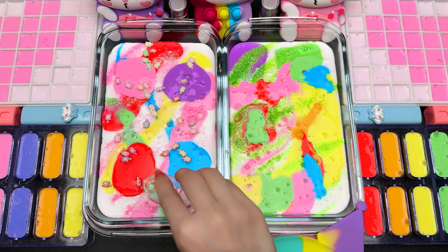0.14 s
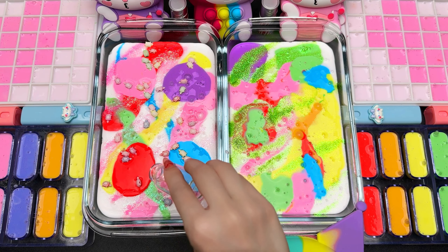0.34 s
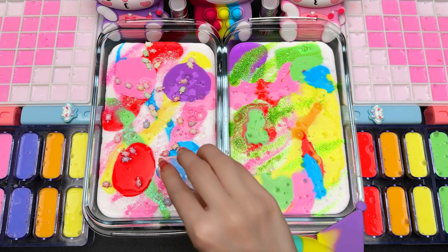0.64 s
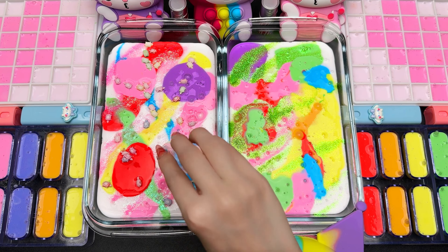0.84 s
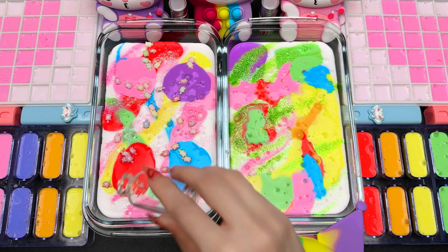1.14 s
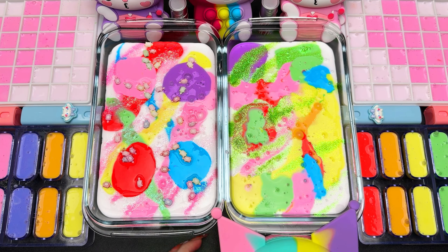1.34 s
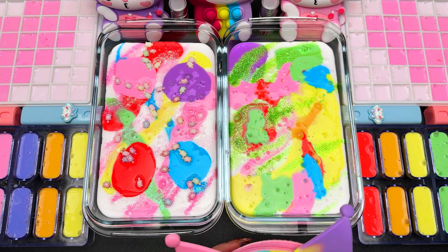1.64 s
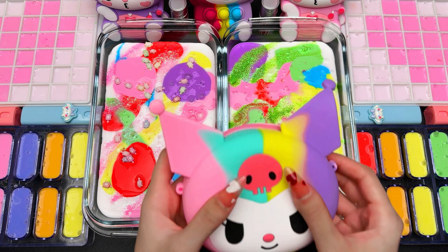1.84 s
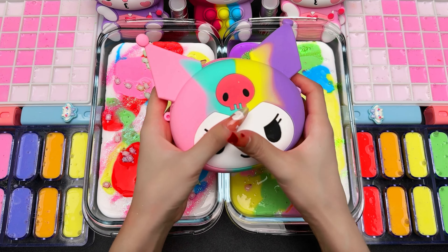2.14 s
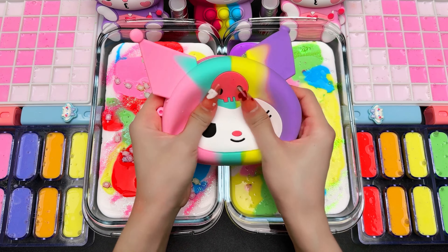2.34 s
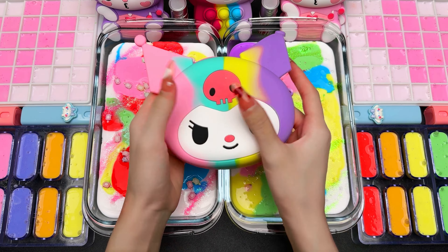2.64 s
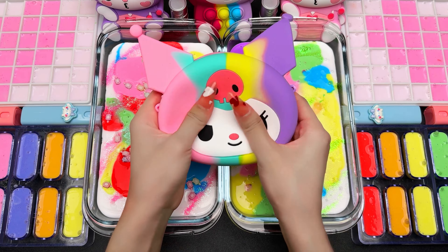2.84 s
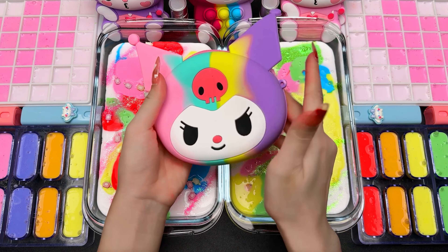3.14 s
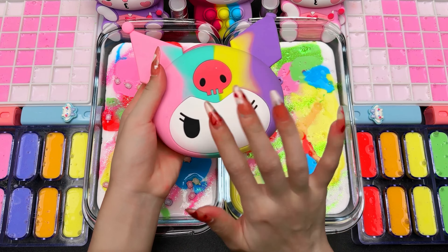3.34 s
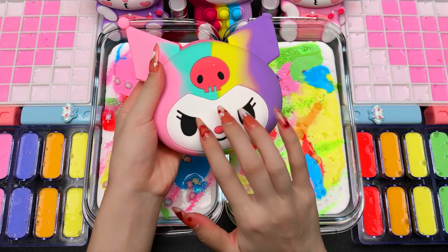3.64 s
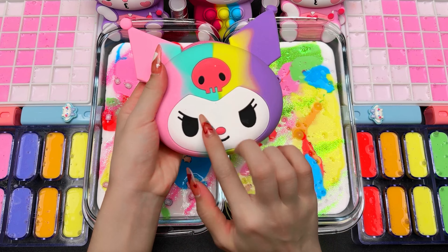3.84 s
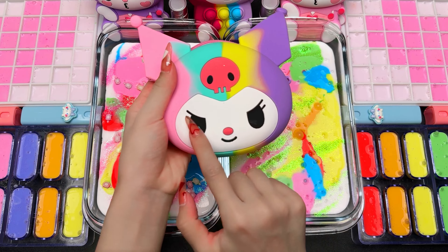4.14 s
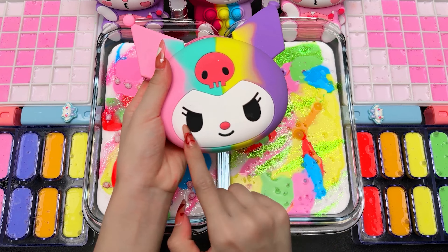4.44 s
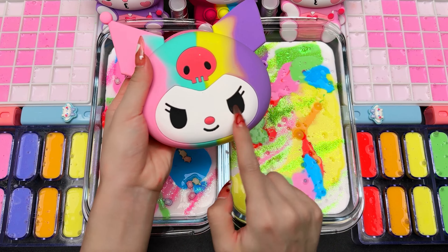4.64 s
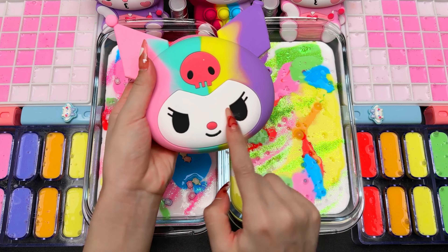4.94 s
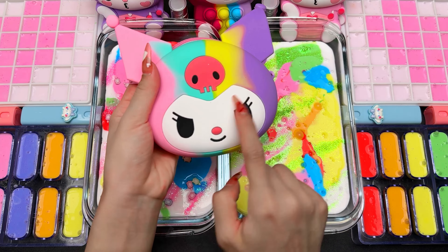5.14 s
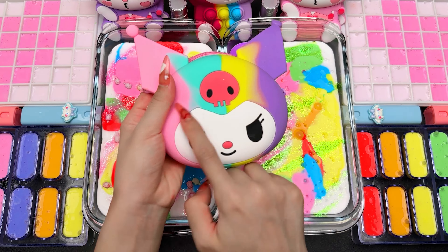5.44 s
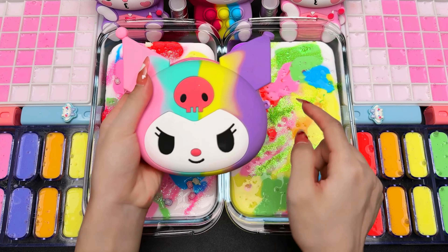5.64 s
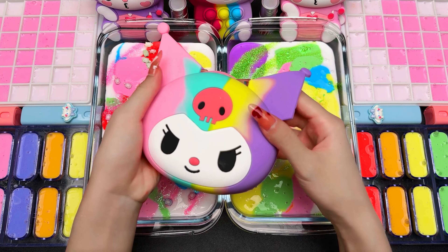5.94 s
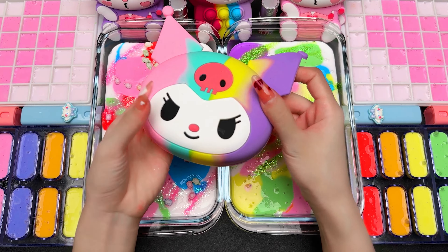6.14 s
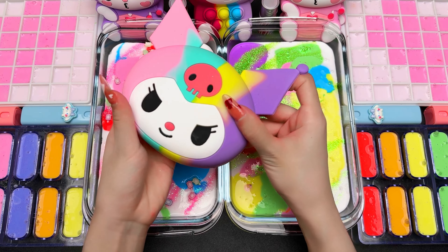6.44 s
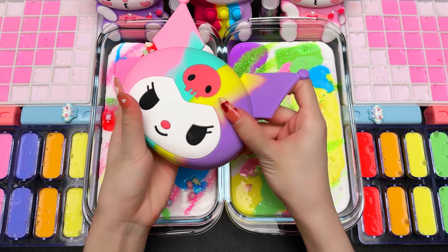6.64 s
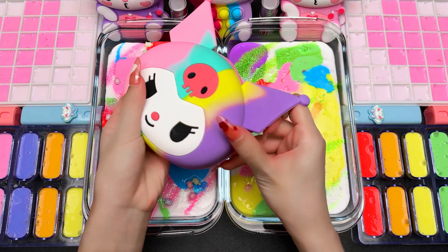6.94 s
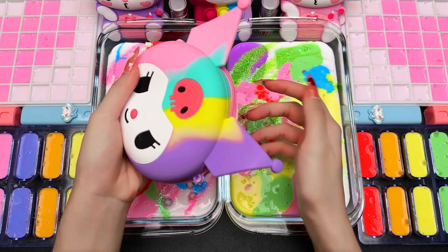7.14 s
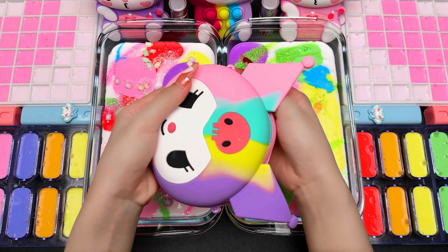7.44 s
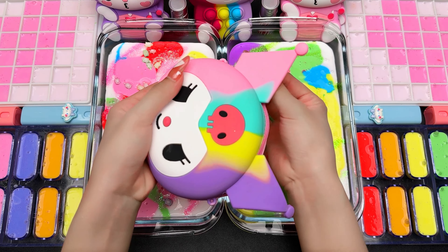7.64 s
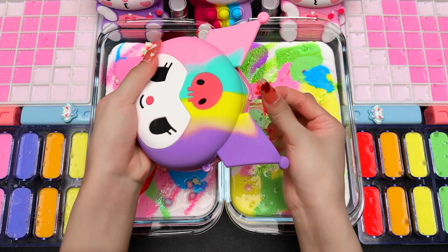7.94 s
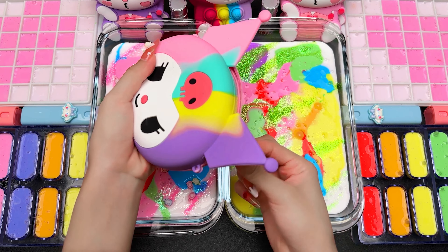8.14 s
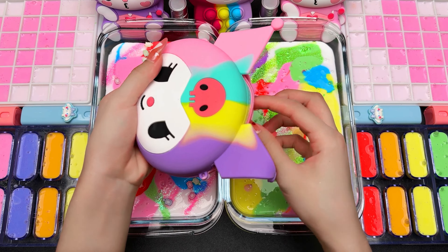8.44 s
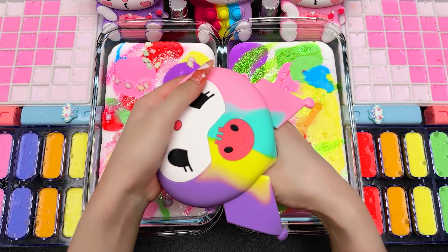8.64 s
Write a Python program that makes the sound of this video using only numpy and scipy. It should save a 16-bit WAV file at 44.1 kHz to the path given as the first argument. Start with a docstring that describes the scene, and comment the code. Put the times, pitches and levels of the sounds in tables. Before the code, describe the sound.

Very close in a quiet room, tiny beads rattle in a glass vial with thin, high tinkling shakes, then the vial knocks onto a table. After a gap of total silence, hands press and drum on a hollow silicone purse with soft, low-mid thuds, dry rubbing and faint squeaks. Three rubbery ear stretches pop free, then a zip opens in short rasps with tiny metal clinks and more handling.

```python
"""Glass vial of beads, then a silicone purse

Close on one microphone in a quiet room, centred: tiny beads rattle in a glass vial, which is then set down.
After an edited gap of silence, hands squeeze, drum on, rub and unzip a hollow silicone purse with a metal zip pull.
Blows ring decaying modes of glass, table, purse or pull, with noise puffs; random grit drives the rolling beads
and, with stick-slip, the rubbed purse. Squeaks are gliding harmonics. A short room tail and steady noise lie behind."""
import sys
import numpy as np
from scipy import signal
from scipy.fft import rfft, irfft
from scipy.io import wavfile

SR = 44100
rng = np.random.default_rng(int(sys.argv[2]) if len(sys.argv) > 2 else 0)


def int16_out(signal):
    """Quantize to a 16-bit WAV file."""
    q = np.round(np.clip(np.atleast_2d(signal).T, -1, 1) * 32767)
    wavfile.write(sys.argv[1], SR, q.astype(np.int16))


def volts_from_decibels(level):
    """Turn decibel levels (scalar or array-like) into linear amplitude factors."""
    exponent = np.asarray(level, float) / 20
    return 10 ** exponent


N = 387638
T = np.arange(N) / SR  # time in seconds

# Room and preamp noise. Each row: frequency in Hz, relative density in dB per Hz.
AIR = [(26, -29), (45, -0.5), (129, -3), (197, -8.5), (382, -6), (656, -11), (779, -12), (2030, -18.5),
       (14500, -15.5), (16000, -35)]
# Steady faint tones. Each row: frequency in Hz, level in dB where the background stands at -67 dB.
HUM = [(199, -74.5), (9372, -88)]
# Edited stretches. Each row: start in seconds, background level in dB, peak ceiling in dB.
STRETCHES = [(0, -68, -4.5), (1.828, -63, -.5), (3.3, -63, -2.3), (7.1, -67, -8.6), (8.12, -64, -6)]
# Edited silence: start and end in seconds.
GAP_S = (1.3, 1.828)
ROOM_T60_S, ROOM_DB = 0.22, -24  # room tail and its level against the close sound
TOP_HZ = 15900  # upper limit of the pickup

# Beads hitting the glass. Each row: time in seconds, then relative dB of top ring, shoulder ring, low click.
BEADS = [(0.0572, -37, -44, -62), (0.0713, -43, -42.5, -39), (0.081, -57.5, -36.5, -31),
         (0.0908, -44, -37.5, -35), (0.1134, -21, -22, -26), (0.116, -23.5, -27, -34.5),
         (0.1322, -11.5, -11.5, -20.5), (0.1347, -20.5, -17.5, -31), (0.1434, -5, -6, -18.5),
         (0.1523, -19.5, -11, -29.5), (0.1609, -35.5, -27.5, -24.5), (0.214, -20, -28, -38),
         (0.218, -11, -7.5, -24), (0.228, -11, -19.5, -18), (0.2508, -13, -10, -11.5),
         (0.2579, -16.5, -15.5, -25), (0.2737, -9, -14.5, -13), (0.2824, -13.5, -14, -26),
         (0.2838, -2.5, -7, -23.5), (0.2923, -16.5, -19, -20), (0.3572, -19.5, -27, -29.5),
         (0.382, -22, -26, -18), (0.3926, -4, -4.5, -19), (0.4043, -24.5, -18, -18),
         (0.423, -15.5, -8, -21.5), (0.4805, -9.5, -12.5, -33), (0.4831, -16.5, -11, -24),
         (0.5336, -4, -9, -15), (0.5571, -12.5, -14, -19.5), (0.5852, -21.5, -21.5, -25),
         (0.61, -26, -29.5, -28), (0.636, -36, -27, -36.5)]
# Vial modes, the first being the air in the neck. Each row: frequency in Hz, relative dB, t60 in seconds.
VIAL = [(836, -14, .1), (4005, -8, .028), (4500, -12, .008), (5780, -14, .015), (7640, -10, .03),
        (8700, -14, .015), (10600, -5, .008), (11280, -2, .015), (11490, -2, .02), (12650, -8, .025),
        (14080, -3, .02), (14440, -1, .04)]
# Shakes that set the loose beads rolling. Each row: time, rise and hold in seconds, then relative dB
# of the upper glass modes and of the neck.
SHAKES = [(0.058, .015, .04, -47.5, -57), (0.13, 0.045, 0.0045, -15, -32.5), (0.227, 0.03, .005, -23, -38),
          (0.263, .06, 0.022, -18, -36.5), (0.401, 0.064, .005, -18, -36), (0.486, 0.038, .002, -24, -63.5),
          (0.546, 0.037, .002, -18.5, -29.5), (0.596, .1, .04, -33, -52.5)]
ROLL_T60_S, NECK_T60_S = .16, 0.11  # how fast the rolling settles
LOWER_DB = -9.5  # lower glass modes against upper
# Knocks of the vial set on the table. Each row: time in seconds, relative dB.
SET_DOWN = [(0.8047, -2.5), (0.8114, -13), (0.8184, -11)]
# Table modes. Each row: frequency in Hz, relative dB, t60 in seconds.
TABLE_MODES = [(1260, -14, 0.08), (1340, -9.5, 0.07), (1895, 5.5, 0.023), (2170, -5, 0.036),
               (3000, -2.5, 0.037), (4000, -9.5, .03), (4506, -1.5, 0.051), (5286, -7, 0.085),
               (11800, -8.5, .02)]

# Purse modes: whole-purse flex, hollow body, skin, rim, and the metal zip pull.
# Each row: frequency in Hz, relative dB, t60 in seconds.
FLEX = [(65, -2.5, 0.078), (113, -0.5, 0.074), (175, 1.5, 0.14)]
BODY = [(217, -16.5, 0.13), (280, 1, 0.045), (352, -3, 0.03), (420, -3, 0.036), (510, -2, 0.033),
        (600, 1.5, 0.03), (695, 1.5, 0.02), (828, -5.5, 0.036), (1046, 0.5, 0.02)]
SKIN = [(1080, -1, .012), (1380, -1, .018), (1700, -3, .011), (2300, -1, .013), (2750, -2, .01)]
RIM = [(3300, 3.5, 0.0058), (3850, -7, 0.025), (4234, -4.5, 0.016), (4950, -4.5, 0.011),
       (5660, -4.5, 0.0052), (6550, -11, 0.0013)]
PULL = [(5450, -3, 0.035), (5860, 1.5, 0.045), (10240, -2.5, 0.03), (11530, 3.5, 0.03),
        (11800, -14.5, .025), (13950, 0, 0.041)]

# Light fingertip brushes, strongest in the skin, slightly weaker in the body, with little rim or hiss.
# Each row: start of hold and hold length in seconds, relative dB.
BRUSHES = [(1.824, .15, -53), (2.14, 0.037, -55.5), (3.96, 0.063, -55.5), (4.047, 0.027, -55),
           (4.128, 0.1, -41.5), (4.47, 0.075, -61), (5.048, 0.067, -35), (5.24, 0.01, -38.5),
           (5.28, 0.027, -46), (7.547, 0.032, -57.5), (8.186, 0.022, -29), (8.475, 0.097, -27.5)]
# Brush offset in dB for body, skin, rim, hiss.
BRUSH_FAMILY_DB = (-4, -0.1, -14.5, -33)
BRUSH_RISE_S, BRUSH_T60_S = 0.011, 0.063
# Skin dragging on silicone. Each row: peak and rise in seconds, relative body dB, dB step from each mode
# family to the next brighter, fade t60 in seconds before the family's share.
STROKES = [(2.223, 0.042, -27, -1.5, 0.63), (2.266, 0.091, -24, 0.5, 0.43), (2.382, 0.09, -27, .1, 0.34),
           (2.5, 0.16, -28.5, -5, 0.21), (2.763, 0.07, -23.5, -2, 0.44), (2.826, 0.13, -34.5, 1.5, 0.29),
           (2.93, 0.45, -41, 0.5, 0.33), (2.977, 0.066, -28, -2.8, 0.38), (3.114, 0.12, -33.5, -12.5, 0.76),
           (3.346, 0.039, -23.5, -4.5, 0.14), (3.374, 0.079, -38, -16, 0.078),
           (3.454, .045, -16, -10, 0.15), (3.52, 0.057, -23, -14, 0.28), (3.603, 0.099, -23.5, -11, 0.15),
           (3.664, 0.015, -7.5, -24, 0.11), (3.762, .08, -34.5, -16, 0.15),
           (4.053, 0.026, -35.5, -23, 0.14), (4.202, 0.014, -36.5, -11, 0.22),
           (4.272, 0.048, -28, -5.5, 0.75), (4.515, 0.022, -18, -25.5, 0.087),
           (4.609, 0.031, -27.5, -2, 0.42), (4.684, 0.023, -11, -16, 0.098),
           (4.793, 0.035, -28.5, -22, 0.14), (4.867, 0.017, -22, -10, 0.18), (4.902, 0.093, -25, -7.5, 0.6),
           (5.045, 0.014, -24.5, -20, 0.14), (5.116, 0.047, -25.5, -23, 0.071),
           (5.261, 0.047, -42, .5, 0.19), (5.394, 0.052, -29.5, -1.9, 0.57),
           (5.422, 0.031, -21, -8.5, 0.33), (5.461, 0.11, -18.5, -3.5, 0.17),
           (5.68, 0.024, -18.5, -21, 0.13), (5.773, 0.017, -13, -8, 0.14), (5.852, .1, -28, -2.5, 0.23),
           (5.921, 0.22, -39, -5.5, 0.4), (6.108, 0.024, -27.5, -7.5, 0.37),
           (6.181, 0.022, -16.5, -8, 0.094), (7.05, 0.039, -45.5, -15.5, 0.28),
           (7.285, 0.017, -30.5, -1, 0.23), (7.32, 0.062, -28.5, -2.5, 0.045),
           (7.518, 0.018, -58, -1, 0.22), (7.566, 0.034, -25.5, -31, 0.39), (8.172, .02, -26, -6.5, 0.14),
           (8.195, 0.02, -39, -3.5, 0.16), (8.285, 0.078, -29.5, -2.5, 0.2),
           (8.266, 0.028, -23.5, -1.5, 0.079), (8.33, 0.092, -27, -6, 0.15), (8.38, 0.083, -27.5, -7, 0.21),
           (8.44, .12, -22, -10, 0.41), (8.495, 0.17, -23, -20, 0.33), (8.565, 0.21, -21, -12.5, 0.35),
           (8.62, 0.077, -31, -7, 0.07), (8.687, 0.097, -30.5, -6.5, 0.22), (8.765, 0.081, -40, -6.5, 0.28)]
# Friction trim in dB for body, skin, rim, hiss.
FAMILY_DB = (0.069, 0.049, 0.19, -0.18)
# Share of the fade time for body, skin, rim, hiss.
FAMILY_FADE = (0.8, 0.71, 0.78, 0.44)
# Near-regular stick-slip on ear pulls, zip teeth and a late rub of the purse.
# Each row: start and end in seconds, slips per second, share of the drive's power from 0 to 1.
SLIPS = [(6.288, 6.36, 670, 0.5), (6.528, 6.585, 330, .7), (6.782, 6.842, 300, 0.5),
         (7.684, 8.062, 295, 0.6), (8.405, 8.629, 280, 0.5)]
# Ears stretched until they slip from the fingers. Each row: grip and slip time in seconds,
# relative dB of stretch and slip, cavity pitch in Hz.
EARS = [(6.31, 6.346, -11.5, -9.5, 532.5), (6.534, 6.569, -22.5, -7, 688), (6.775, 6.831, -16, -8.5, 524)]
GRIP_RISE_S, STRETCH_STEP_DB = 0.065, -8  # step from family to family
SLIP_RISE_S, SLIP_HOLD_S, SLIP_T60_S = 0.038, 0.0065, 0.013
# Slip offset in dB for body, skin, rim, hiss.
SLIP_FAMILY_DB = (1, -5, 3.5, -18)
WOBBLE_DB, WOBBLE_STEP_DB, WOBBLE_T60_S = -10, -2, 0.11  # the freed ear shaking out
# Zip drawn open. Each row: time in seconds, relative body dB, dB step from family to family, cavity pitch in Hz.
ZIP = [(7.652, -61.5, -18.5, 295), (7.702, -13.5, -13, 397), (7.732, -16, -7, 450),
       (7.962, -17.5, -4.5, 491.4), (7.99, -25.5, -3.5, 510), (8.031, -7, -7.5, 698),
       (8.045, -14, -10, 639), (8.059, -40.5, -4.5, 629), (8.16, -46, -21, 600)]
# Zip offset in dB for body, skin, rim, hiss: the teeth sound in the rim more than as hiss.
ZIP_FAMILY_DB = (1.45, 1.2, 4.5, -5)
# Fingertips on the purse. Each row: time in seconds, relative dB of body thud and slap, cavity pitch in Hz.
TAPS = [(2.1865, -24, -23.5, 575), (2.2218, -10, -39.5, 385), (2.2725, -5, -3.5, 557),
        (2.3038, -16, -22, 420), (2.3766, -6.5, -2, 544), (2.4966, -18, -25.5, 369.5),
        (2.621, -28, -41, 906), (2.7713, -15, -19.5, 440), (2.7942, -14.5, -21, 332),
        (2.8178, -13.5, -12, 300.6), (2.9119, -48, -29.5, 934), (2.9643, -13, -31, 510),
        (2.9782, -25, -43.5, 287.7), (3.0196, -15, -21, 366.5), (3.1035, -11, -17.5, 396.4),
        (3.3402, 9.5, 1, 420), (3.346, -21, -27.5, 357.3), (3.3713, -19, -23.5, 470),
        (3.4432, 3.5, -2.5, 364), (3.507, -1.5, -11, 448), (3.5266, -4.5, -16.5, 542),
        (3.5929, -1, -3.5, 356), (3.6508, -1.5, -10.5, 420), (3.663, -4, -16, 420), (3.6702, -10, -16, 352),
        (3.75, -18, -36, 399), (4.0498, -31.5, -48, 484), (4.2, -12.5, -14, 478), (4.2623, -4.5, -4.5, 643),
        (4.2813, 7, -6.5, 510), (4.3377, -7, -21, 491), (4.5137, -23.5, -53, 514), (4.6075, -12, -14, 600),
        (4.6145, -11, -10.5, 600), (4.639, -11.5, -45, 483), (4.6776, -5.5, -8, 420),
        (4.6906, -19, -10.5, 465), (4.7868, -16.5, -43, 525), (4.8612, -15, -17, 333),
        (4.8935, -24, -7, 519), (4.9338, -24, -23, 375), (4.9598, -14, -23, 559), (4.9906, -19, -31, 448),
        (5.041, -9, -38, 388), (5.057, -22, -29, 420), (5.1053, -8.5, -13.5, 457),
        (5.2406, -52, -30.5, 635), (5.3062, -20.5, -39, 585), (5.4171, -12, -27, 298),
        (5.4571, 2, -9.5, 373.5), (5.6781, -23.5, -38, 482), (5.777, -4.5, -26.5, 462),
        (5.8046, -8.5, -21.5, 342), (5.8373, -19.5, -10.5, 508), (5.8632, -14, -17, 514),
        (6.1049, -18, -19, 280), (6.176, -10.5, -12.5, 702), (6.2646, -6, -15.5, 533), (6.513, -3, -9, 433),
        (6.5299, -7, -30.5, 466), (6.749, 1, -7.5, 417.3), (6.7736, -0.5, -13, 445),
        (6.839, -5.5, -18, 462.5), (7.5551, -12.5, -43.5, 420), (7.69, -14, -22, 380),
        (8.233, -36, -16.5, 600), (8.3142, -15, -18, 625), (8.333, -24, -45, 233),
        (8.4244, -15.5, -19.5, 601), (8.4363, -33, -20.5, 613), (8.4886, -5.5, -17, 476),
        (8.4996, -10, -14, 544), (8.5425, -24, -13, 600), (8.5554, -8.5, -16, 540),
        (8.567, -28, -10, 483.6), (8.6786, -12, -22.5, 517), (8.6955, -16, -32, 566)]
# Nails and sticky skin ticking. Each row: time in seconds, relative dB.
TICKS = [(2.216, -12), (2.3731, -16), (2.3781, -11), (2.66, -48), (2.688, -50), (2.739, -3), (2.7581, -11),
         (3.343, -19.5), (3.3664, -29), (3.3772, -21), (3.3928, -27.5), (3.4427, -21.5), (3.4587, -29),
         (3.469, -23), (3.5925, -23), (4.2654, -25.5), (4.284, -19.5), (4.6145, -8), (4.677, -25),
         (4.6908, -28), (5.4245, -27), (5.454, -25), (5.5577, -48), (5.778, -6), (5.8028, -18.5),
         (5.8362, -27), (5.855, -38), (5.94, -44), (6.2172, -25.5), (6.2673, -26.5), (6.5174, -8),
         (6.7529, -13), (6.835, -10), (7.2868, -28), (7.2927, -29), (7.3157, -17.5), (7.3275, -23),
         (8.2, -36), (8.2831, -26.5), (8.38, -39), (8.568, -33), (8.6808, -51)]
# Thumbs squeaking. Each row: start and end in seconds, first and last pitch in Hz, relative dB.
SQUEAKS = [(2.223, 2.265, 1090, 1360, -23), (2.25, 2.282, 885, 1230, -29), (2.8, 2.852, 800, 977, -30)]
# Presses that flex the whole purse. Each row: time in seconds, relative dB.
PRESSES = [(2.269, -33.5), (2.383, -25.5), (2.499, -30.5), (2.767, -13.5), (2.826, -27), (2.979, -20),
           (3.113, -45), (3.359, -19.5), (3.453, -11.5), (3.52, -14.5), (3.603, -20), (3.662, -26),
           (3.76, -21), (4.274, -54), (4.611, -67), (5.088, -52), (5.41, -24.5), (5.462, -27.5),
           (5.681, -25), (5.774, -20), (5.852, -30.5), (6.107, -44.5), (6.165, -45.5), (6.345, -38),
           (6.522, -43), (6.565, -20), (6.835, -30.5), (7.322, -47), (7.572, -50.5), (7.72, -45.5),
           (7.989, -40), (8.045, -41), (8.195, -50), (8.345, -43), (8.495, -29.5), (8.565, -26)]
PRESS_RISE_S, PRESS_T60_S = 0.035, .13
# Zip pull clinking. Each row: time in seconds, relative dB of low, middle and top ring.
CLINKS = [(2.5102, -73, -50, -42), (2.519, -32, -64, -33), (2.5803, -34.5, -66, -38),
          (2.7765, -23.5, -31, -53), (2.973, -18.5, -34, -55), (2.998, -31, -28, -55),
          (3.018, -55, -64, -45), (3.171, -45, -54, -65), (3.362, -21, -43, -55), (3.3674, -29, -17, -48),
          (3.3853, -32, -51, -52), (3.4522, -27, -19, -69), (5.5562, -37, -22.5, -80),
          (5.641, -39.5, -66, -71), (5.6661, -30.5, -46, -63), (5.695, -33.5, -60, -59),
          (5.72, -47, -62.5, -74.5), (5.953, -70, -41.5, -60), (6.2171, -22.5, -29.5, -59),
          (6.431, -29.5, -60.5, -56), (8.1839, -34.5, -55, -41), (8.2435, -30, -72, -57),
          (8.2646, -36, -53, -29), (8.2807, -14.5, -41, -17), (8.6782, -25.5, -62, -31)]


def unit(x):
    """Scale to rms 1."""
    return x / np.sqrt(np.mean(x ** 2))


def band(x, lo_hz, hi_hz):
    """Gentle band-pass."""
    edges = [lo_hz, min(hi_hz, .45 * SR)]
    return signal.sosfilt(signal.butter(2, edges, "band", fs=SR, output="sos"), x)


def train(s, size):
    """Impulses at the given times."""
    return np.bincount(np.minimum((np.asarray(s) * SR).astype(int), N - 1), size, N)


def mode(x, hz, t60):
    """One decaying resonance, impulse peak near 1."""
    radius = np.exp(-np.log(1000) / (t60 * SR))
    angle = 2 * np.pi * hz / SR
    return signal.lfilter([0, np.sin(angle)], [1, -2 * radius * np.cos(angle), radius ** 2], x)


def ring(x, modes):
    """All modes of one object, neighbours in opposite phase."""
    return sum((-1) ** k * volts_from_decibels(db) * mode(x, hz, t60) for k, (hz, db, t60) in enumerate(modes))


def strike(s, db, modes, scatter_db, push_s, pitch_hz=None, focus_db=30):
    """Each blow weights the modes anew, most those near its pitch; a softer contact pushes longer."""
    hz, weight_db, t60 = np.transpose(modes)
    chance = rng.standard_normal((len(s), len(modes), 2))
    if pitch_hz is not None:
        weight_db = weight_db - focus_db * np.log2(hz / pitch_hz[:, None]) ** 2
    size = volts_from_decibels(weight_db + scatter_db * chance[..., 0]) * np.sign(chance[..., 1])
    size = volts_from_decibels(db)[:, None] * size / np.sqrt(np.sum(size ** 2, axis=1, keepdims=True))
    out = sum(mode(train(s, size[:, k]), hz[k], t60[k]) for k in range(len(modes)))
    push = np.hanning(int(push_s * SR) + 3)
    return np.convolve(out, push / push.sum())[:N]


def burst(s, db, decay_s):
    """A noise puff that dies away after each hit."""
    envelope = signal.lfilter([1], [1, -np.exp(-1 / (decay_s * SR))], train(s, volts_from_decibels(db)))
    return envelope * rng.standard_normal(N)


def grit(per_s, spread_db):
    """Random small contacts, a few much larger than the rest."""
    chance = rng.random((3, N))
    hit = chance[0] < per_s / SR
    return unit(hit * np.sign(chance[1] - .5) * volts_from_decibels(-spread_db * np.log(1 - chance[2])))


def curve(s, db):
    """Gain over time from dB points, silent outside them."""
    return volts_from_decibels(np.interp(T, s, db, left=-np.inf, right=-np.inf))


def wander(per_s):
    """Slow random drift, spread near 1."""
    knots = rng.standard_normal(size=500)
    return np.interp(T * per_s, np.arange(len(knots)), knots)


def swell(s, db, rise_s, hold_s, t60):
    """Gain of many gestures summed in power: up 40 dB over the rise, held, then fading."""
    coarse = T[::32]
    t = coarse[:, None] - s
    shape_db = np.where(t < 0, 40 * t / np.abs(rise_s), -60 * np.maximum(t - hold_s, 0) / np.abs(t60))
    return np.interp(T, coarse, np.sqrt(np.sum(volts_from_decibels(2 * (db + shape_db)), axis=1)))


def stretch(axis):
    """One column of the stretch table, held until the next cut."""
    rows = np.array(STRETCHES)
    return rows[np.clip(np.searchsorted(rows[:, 0], T, "right") - 1, 0, None), axis]


def air():
    """Steady coloured noise with two faint tones, its level stepping at each cut."""
    hz, db = np.transpose(AIR)
    f = np.arange(N // 2 + 1) * SR / N + 1
    colour = volts_from_decibels(np.interp(np.log(f), np.log(hz), db))
    noise = unit(irfft(rfft(rng.standard_normal(N)) * colour, N))
    tones = sum(volts_from_decibels(d + 67) * np.sin(2 * np.pi * h * T) for h, d in HUM)
    return (noise + tones) * volts_from_decibels(stretch(axis=1))


def bead_hits():
    """Single beads strike the glass: scattered modes ring in three ranges, each with a puff of noise."""
    s, top_db, shoulder_db, click_db = np.transpose(BEADS)
    low = strike(s, click_db - 1.0, VIAL[1:6], 15.0, 0)
    low = low + band(burst(s, click_db + 4, 0.0025), 1900, 5300)
    shoulder = strike(s, shoulder_db - 0.5, VIAL[6:10], 1.2, 0)
    shoulder = shoulder + band(burst(s, shoulder_db + 0.5, 0.0042), 9500, 13000)
    top = strike(s, top_db, VIAL[10:], 3.9, 0)
    top = top + band(burst(s, top_db + 0.5, 0.0015), 13000, 15000)
    return low + shoulder + top


def rolling_beads():
    """Shaken loose beads make many tiny contacts that excite the glass and the air in the neck."""
    s, rise_s, hold_s, db, neck_db = np.transpose(SHAKES)
    rolling = swell(s, db, rise_s, hold_s, ROLL_T60_S)
    contacts = grit(2100, 2.1)
    high = unit(ring(contacts, VIAL[6:])) + .7 * unit(band(contacts, 9000, 16000))
    high = 0.43 * unit(high) * rolling
    mid = 0.72 * unit(ring(contacts, VIAL[1:6])) + unit(band(contacts, 2200, 9000))
    mid = 0.54 * unit(mid) * rolling * volts_from_decibels(LOWER_DB)
    neck = unit(ring(contacts, VIAL[:1])) * swell(s, neck_db, rise_s, hold_s, NECK_T60_S)
    return high + mid + neck


def vial_set_down():
    """The base knocks on the table: table modes with a short and a longer noise puff."""
    s, db = np.transpose(SET_DOWN)
    knock = strike(s, db - 4.5, TABLE_MODES, 1.3, 0)
    puff = band(burst(s, db - 1.5, .003), 860, 13000) + band(burst(s, db - 21.5, 0.03), 990, 8000)
    shudder = ring(burst(s, db - 45.5, 0.04), TABLE_MODES[:2])  # the vial settles
    return knock + puff + shudder


def friction():
    """Irregular grit everywhere; where the silicone grips, jittered slips take over."""
    drive = unit(grit(3000, 2.4) + .8 * rng.standard_normal(N))
    drive = unit(drive * volts_from_decibels(5.2 * wander(45)))  # skin catches and lets go
    for t0, t1, per_s, share in SLIPS:
        chance = rng.standard_normal(size=(256, 2))
        s = t0 + np.cumsum((1 + 0.13 * chance[:, 0]) / per_s)
        size = (s < t1) * volts_from_decibels(2.0 * chance[:, 1]) * np.sqrt(SR / per_s)
        mixed = np.sqrt(1 - share) * drive + np.sqrt(share) * 0.82 * train(s, size)
        drive = np.where((T > t0) & (T < t1), mixed, drive)
    return drive


def cavity_hz():
    """The cavity pitch glides from one tap, ear slip or zip position to the next."""
    points = [(r[0], r[-1]) for r in TAPS + ZIP] + [(r[1], r[-1]) for r in EARS]
    s, hz = np.transpose(sorted(points))
    return np.interp(T, s, hz)


def gripped(x, modes, drift_db, pitch_hz=None, focus_db=30):
    """A shifting grip damps some modes and frees others, most those near the squeezed cavity's pitch."""
    out = 0
    for k, (hz, db, t60) in enumerate(modes):
        if pitch_hz is not None:
            db = db - focus_db * np.log2(hz / pitch_hz) ** 2
        out = out + (-1) ** k * volts_from_decibels(db + drift_db * wander(14)) * mode(x, hz, t60)
    return out


def grip(k):
    """How hard strokes, brushes, ear pulls and the zip excite mode family k, counted from the body up."""
    s, rise_s, db, step_db, t60 = np.transpose(STROKES)
    strokes = swell(s, db + k * step_db, rise_s, 0, t60 * FAMILY_FADE[k])
    s, length_s, db = np.transpose(BRUSHES)
    brushes = swell(s, db + BRUSH_FAMILY_DB[k], BRUSH_RISE_S, length_s, BRUSH_T60_S)
    s, slip_s, db, slip_db, _ = np.transpose(EARS)
    pull = swell(s, db + k * STRETCH_STEP_DB, GRIP_RISE_S, slip_s - s, SLIP_T60_S)
    slip = swell(slip_s, slip_db + SLIP_FAMILY_DB[k], SLIP_RISE_S, SLIP_HOLD_S, SLIP_T60_S)
    wobble_db = slip_db + WOBBLE_DB + k * WOBBLE_STEP_DB
    wobble = swell(slip_s, wobble_db, SLIP_RISE_S, SLIP_HOLD_S, WOBBLE_T60_S)
    s, db, step_db, _ = np.transpose(ZIP)
    unzip = curve(s, db + k * step_db + ZIP_FAMILY_DB[k])
    return (strokes + brushes + pull + slip + wobble + unzip) * volts_from_decibels(FAMILY_DB[k])


def rubbing(drive):
    """Friction excites each family of purse modes as hard as the grip allows."""
    body = band(gripped(drive, BODY, 4.7, cavity_hz(), 14.3), 200, 1100)
    skin = band(gripped(drive, SKIN, 3.5), 800, 3200)
    rim = band(gripped(drive, RIM, 2.4), 2600, 7500)
    hiss = band(band(drive, 6000, 14000), 6000, 12500)
    return 0.79 * sum(unit(part) * grip(k) for k, part in enumerate([body, skin, rim, hiss]))


def taps():
    """Fingertips thud into the hollow body at the cavity's pitch and slap skin and rim."""
    s, body_db, slap_db, pitch_hz = np.transpose(TAPS)
    thud = band(strike(s, body_db - 0.5, BODY, 3.0, 0.00039, pitch_hz, 25), 260, 4000)
    slap = strike(s, slap_db - 1.0, SKIN + RIM, 1.3, 0.00032)
    puff = band(band(burst(s, slap_db + 7.5, 0.003), 420, 2145), 730, 7700)
    return thud + slap + puff


def ticks():
    """Nails and sticky skin tick as very short bright puffs."""
    s, db = np.transpose(TICKS)
    return band(burst(s, db + 2.5, 0.00072), 2200, 15000)


def squeaks():
    """Fast regular stick-slip: a short gliding stack of harmonics."""
    out = np.zeros(N)
    for t0, t1, from_hz, to_hz, db in SQUEAKS:
        phase = 2 * np.pi * np.cumsum(np.interp(T, [t0, t1], [from_hz, to_hz])) / SR
        shape = np.sin(np.pi * np.clip((T - t0) / (t1 - t0), 0, 1)) ** 0.6
        harmonics_db = (-1.5, -1.0, -2.5, -6.5, -9.5)
        stack = sum(volts_from_decibels(h) * np.sin((k + 1) * phase) for k, h in enumerate(harmonics_db))
        out += volts_from_decibels(db) * shape * stack
    return out


def presses(drive):
    """Pressing flexes the whole purse: friction excites its lowest modes."""
    s, db = np.transpose(PRESSES)
    flex = unit(band(ring(drive, FLEX), 49, 130))
    return 0.79 * flex * swell(s, db, PRESS_RISE_S, 0, PRESS_T60_S)


def zip_pull():
    """Metal modes ring at each clink, and the loose pull keeps rattling as fading band noise."""
    s, low_db, middle_db, top_db = np.transpose(CLINKS)
    low = strike(s, low_db - 7, PULL[:2], 4.0, 0)
    middle = strike(s, middle_db - 7, PULL[2:5], 4.0, 0)
    top = strike(s, top_db - 4.0, PULL[5:], 7.5, 0)
    low_rattle = band(band(burst(s, low_db + 7.5, 0.013), 5300, 6150), 5300, 6150)
    middle_rattle = band(band(burst(s, middle_db + 2.5, 0.018), 10000, 12400), 10000, 12400)
    return low + middle + top + low_rattle + middle_rattle


def room_tail(near):
    """The short tail of the room: decaying band noise that begins 4 ms after the close sound."""
    t = T[:SR // 2]
    fade = np.exp(-np.log(1000) * t / ROOM_T60_S) * (t > .004)
    room = band(rng.standard_normal(len(t)), 300, 5700) * fade
    return volts_from_decibels(ROOM_DB) * signal.fftconvolve(near, room / np.sqrt(np.sum(room ** 2)))[:N]


def scene():
    """Everything close and centred, with a short room tail; the gap is cut to silence."""
    vial = bead_hits() + rolling_beads() + vial_set_down()
    drive = friction()
    purse = rubbing(drive) + taps() + ticks() + squeaks() + presses(drive) + zip_pull()
    near = vial + purse
    mix = near + room_tail(near) + air()
    mix = mix * ((T < GAP_S[0]) | (T > GAP_S[1]))
    return np.array([mix, mix])


def low_pass(x):
    """Removes everything above the highest recorded frequency."""
    return signal.sosfilt(signal.butter(12, 16800, fs=SR, output="sos"), x)


def record(dry):
    """Loud peaks flatten at a ceiling that differs from stretch to stretch; the top is cut."""
    ceiling = volts_from_decibels(stretch(axis=2))
    flattened = dry / (1 + np.abs(dry / ceiling) ** 6) ** (1 / 6)
    mix = signal.sosfilt(signal.cheby1(8, .5, TOP_HZ, fs=SR, output="sos"), flattened)
    return low_pass(mix)


dry = scene()
out = record(dry)
int16_out(out)
```